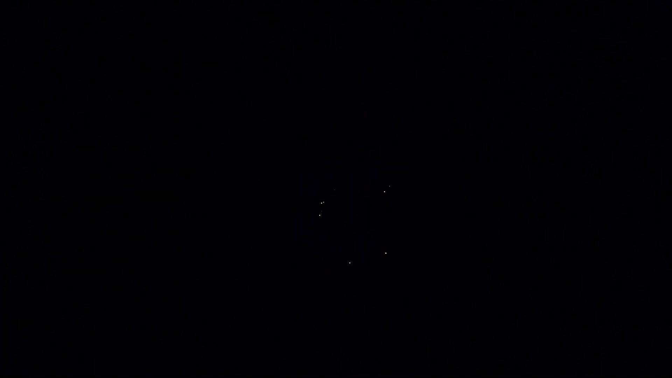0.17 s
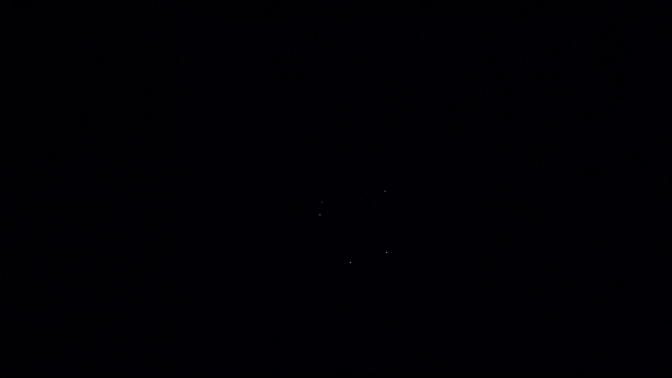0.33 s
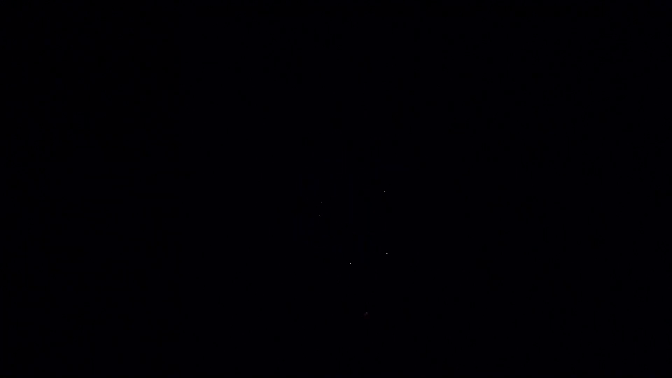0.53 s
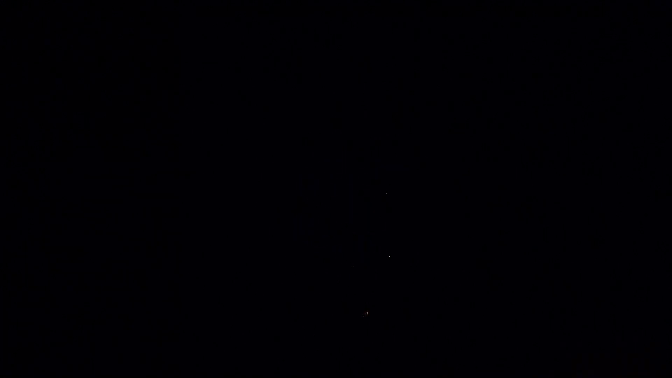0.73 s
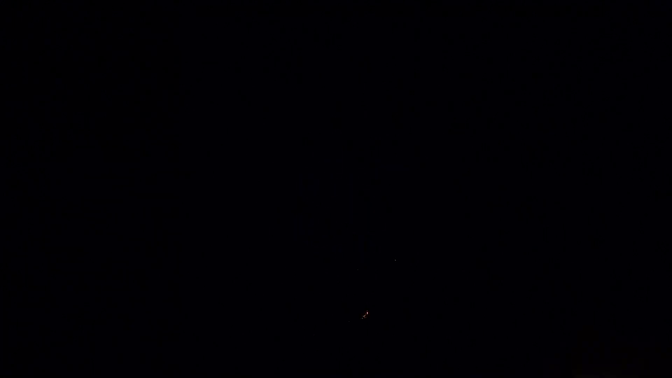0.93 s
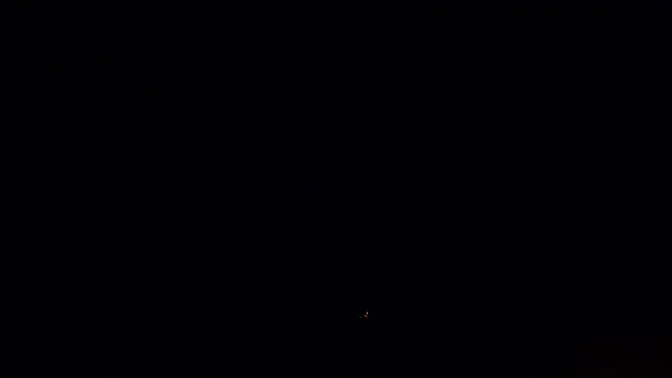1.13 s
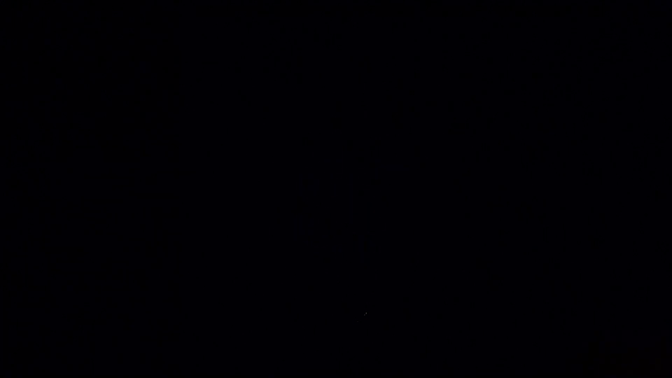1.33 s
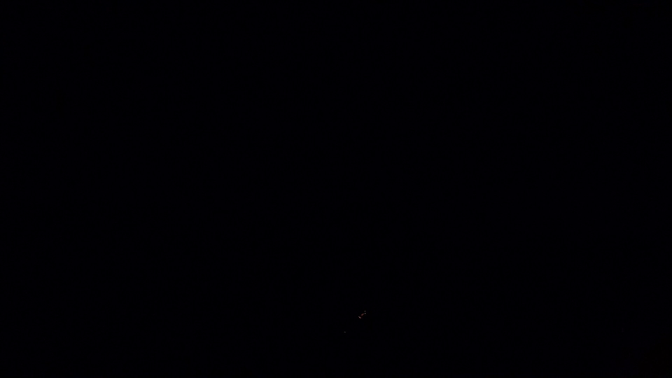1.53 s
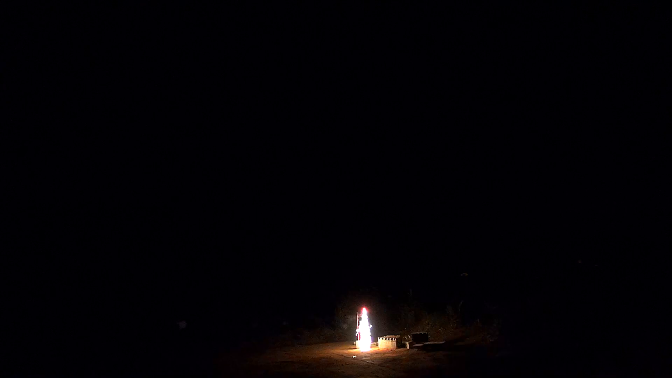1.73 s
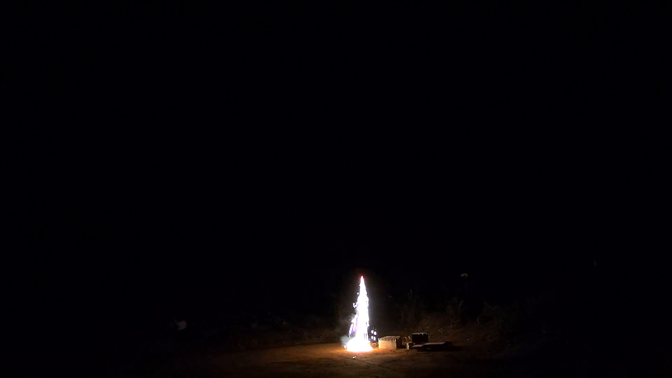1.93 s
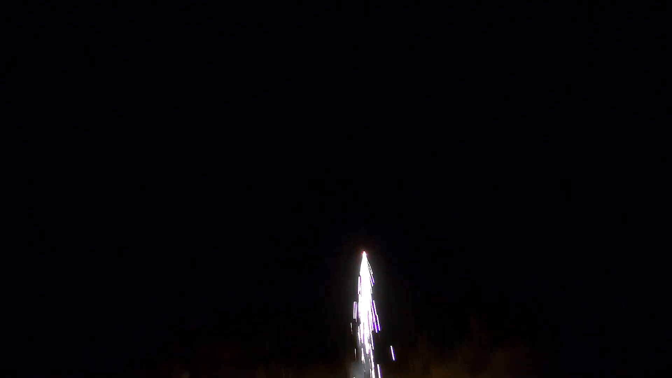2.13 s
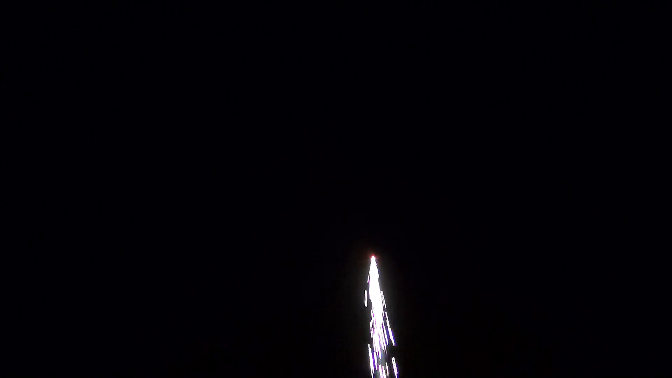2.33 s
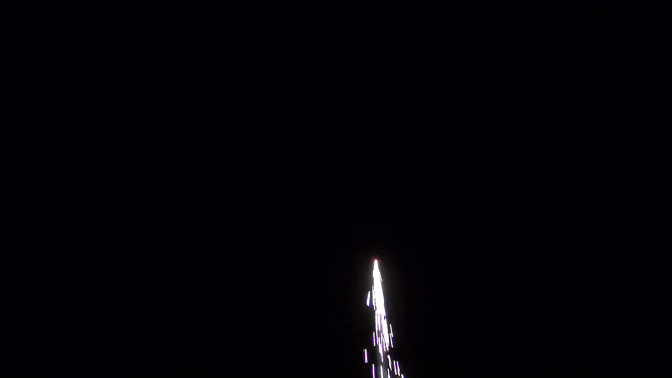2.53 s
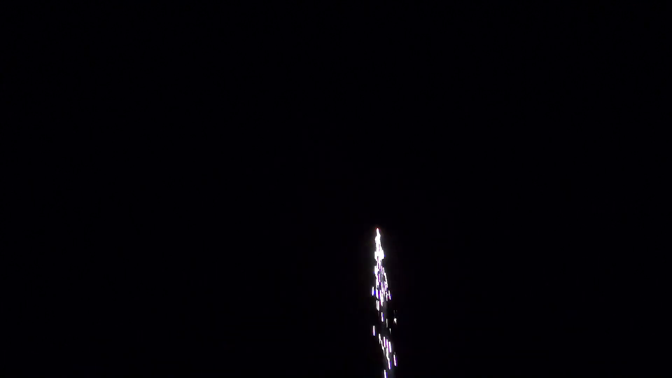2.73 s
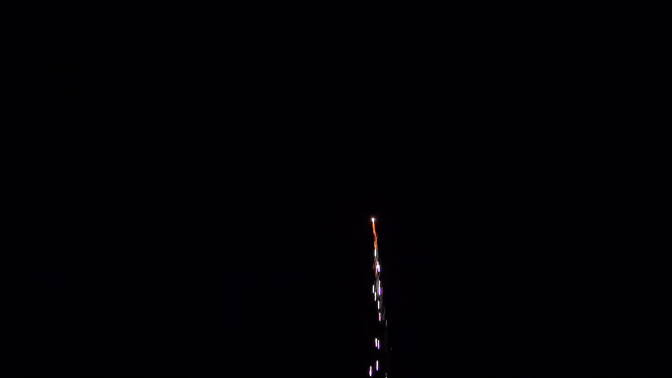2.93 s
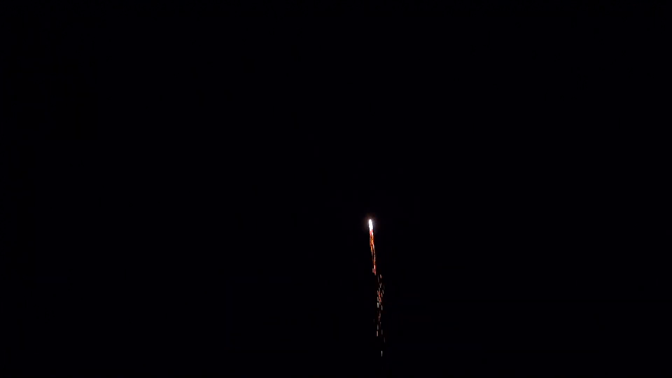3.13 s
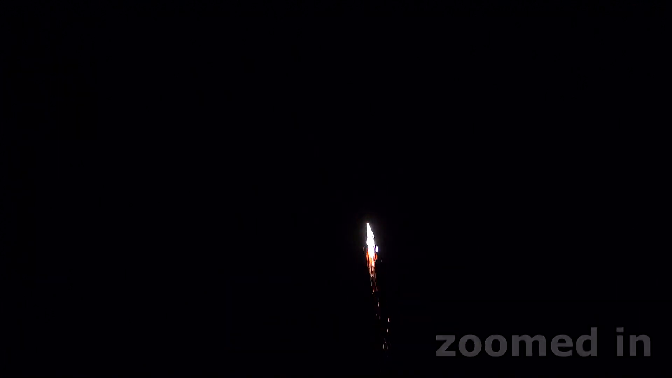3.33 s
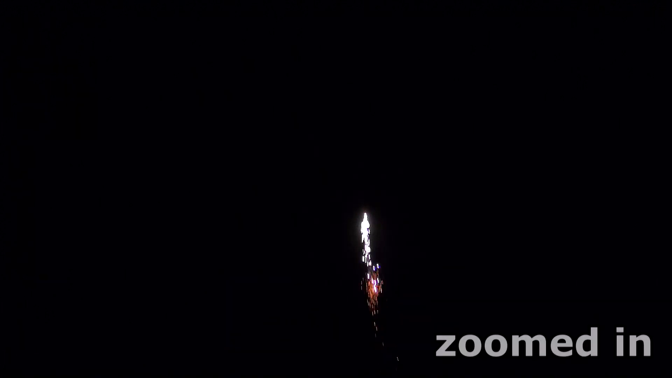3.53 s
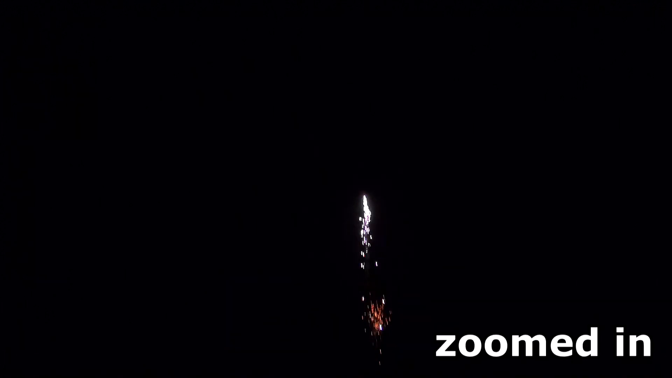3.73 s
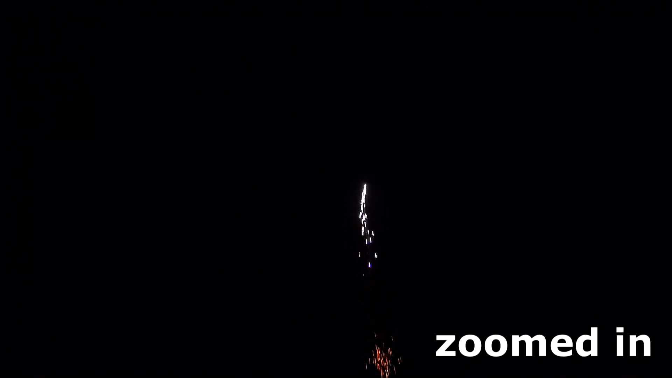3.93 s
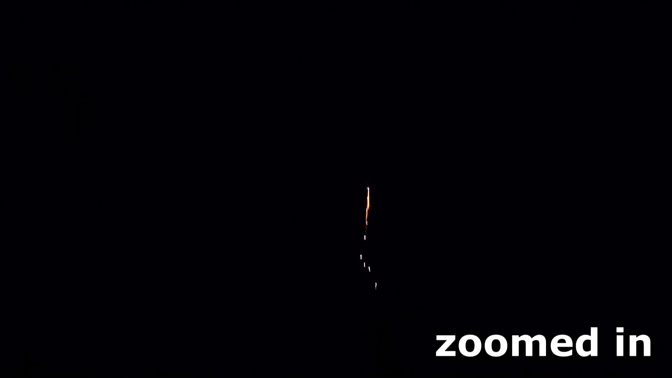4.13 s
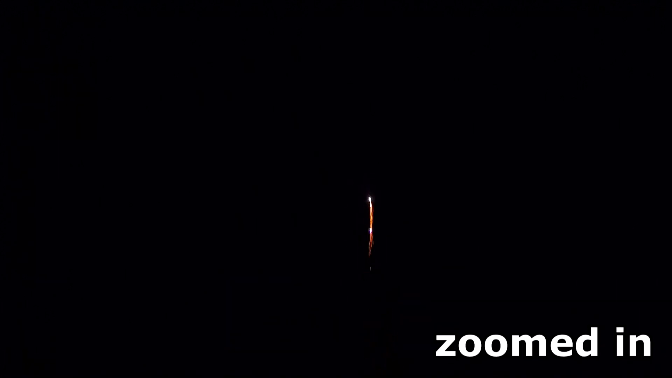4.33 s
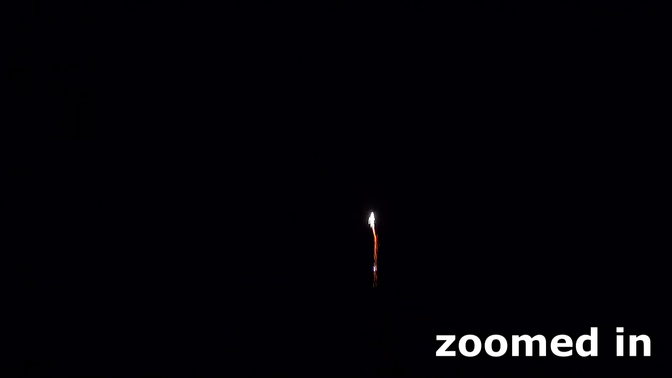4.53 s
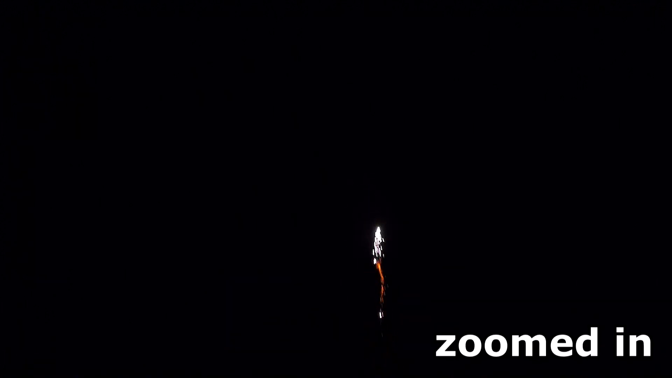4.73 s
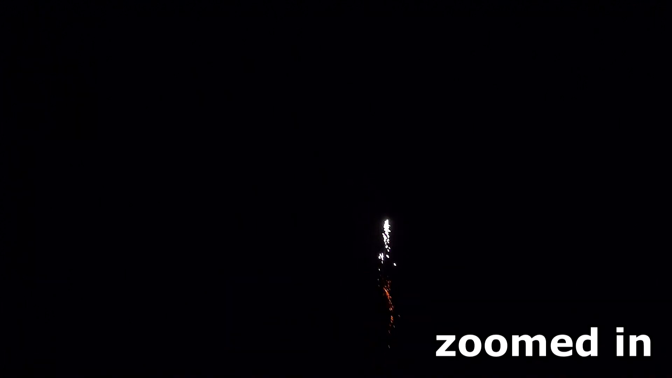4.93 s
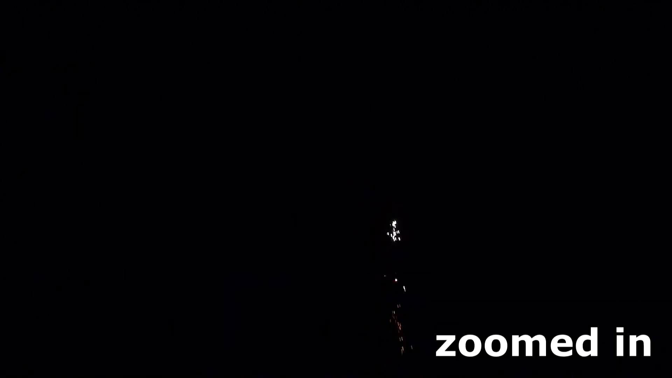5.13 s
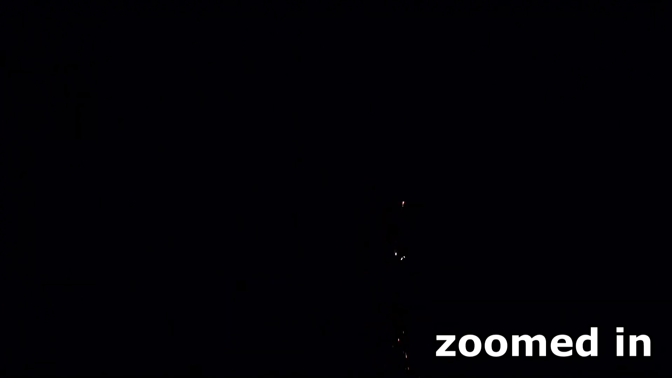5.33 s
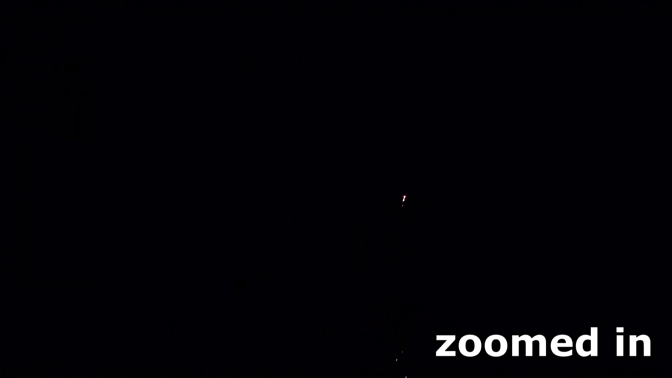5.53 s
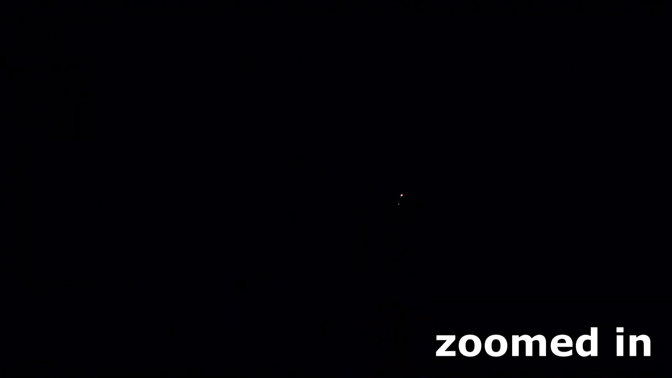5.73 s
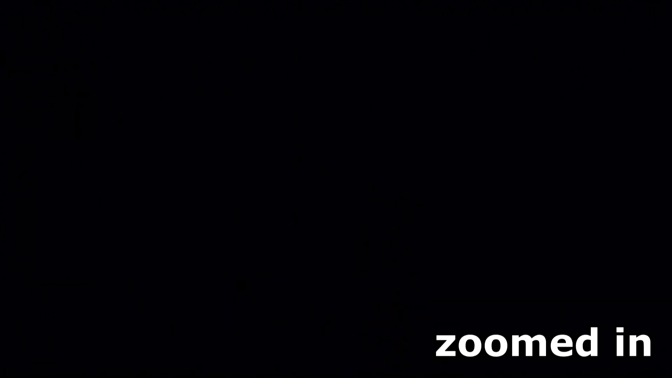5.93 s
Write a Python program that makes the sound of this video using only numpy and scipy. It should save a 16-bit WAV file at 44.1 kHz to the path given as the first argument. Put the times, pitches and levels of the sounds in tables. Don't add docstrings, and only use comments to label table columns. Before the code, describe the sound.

A fuse hisses and spits in a quiet open field at night, then a small rocket shrieks three falling whistles, each farther away and echoing.

```python
import sys
import numpy as np
from scipy import signal
from scipy.fft import rfft, irfft, next_fast_len
from scipy.io import wavfile
from scipy.ndimage import uniform_filter1d, minimum_filter1d, map_coordinates

SR = 44100
rng = np.random.default_rng(int(sys.argv[2]) if len(sys.argv) > 2 else 0)


def undo_db(level):
    steps = np.asarray(level, float) / 20
    return 10 ** steps


def materialize(psi):
    bounded = np.clip(np.atleast_2d(psi).T, -1, 1)
    quanta = np.round(bounded * 32767).astype(np.int16)
    wavfile.write(sys.argv[1], SR, quanta)


N = 267246


def unit(x):
    return x / np.sqrt(np.mean(np.abs(x) ** 2) + 1e-20)


def along(points, hz):
    f, v = np.transpose(points)
    return np.interp(np.log(hz + 1), np.log(f + 1), v)


def curves(rows):
    s, *columns = np.transpose(rows)
    t = np.arange(N) / SR
    gate = np.clip(np.minimum(t - s[0], s[-1] - t) / 0.0034, 0, 1)
    return [np.interp(t, s, column) for column in columns] + [gate]


def spells(rows):
    t = np.arange(N) / SR
    return [(np.cos(np.pi * np.clip((t - s) / length, -.5, .5)) ** 2, size) for s, length, size in rows]


def wobble(rate):
    return map_coordinates(rng.standard_normal(int(N * rate / SR) + 4), [np.arange(N) * rate / SR])


def blur(rate):
    return unit(wobble(rate) + 1j * wobble(rate))


def filtered(x, response):
    m = next_fast_len(N + 8192)
    return irfft(rfft(x, m) * response(np.fft.rfftfreq(m, 1 / SR)), m)[..., :N]


# (frequency [Hz], correlation [0-1])
LIKENESS = [(60, 0.94), (1000, 1), (4000, 1), (9000, 0.74)]


def rush(spectrum, band):
    def mid_and_side(hz):
        turn = np.arccos(np.clip(along(LIKENESS, hz), -1, 1)) / 2
        return undo_db(along(spectrum, hz)) * [np.cos(turn), np.sin(turn)]

    mid, side = filtered(rng.standard_normal((2, N)), mid_and_side)
    inside = filtered(mid, lambda hz: (hz > band[0]) * (hz < band[1]))
    return np.array([mid + side, mid - side]) / np.std(inside)


# (frequency [Hz], density [dB per Hz])
NIGHT_SPECTRUM = [(25, -32.5), (60, -4.5), (110, -2.5), (200, -6.5), (400, -20), (1000, -16), (3000, -24.5),
                  (8000, -52.5), (15500, -59)]
# (time [s], level [dB])
NIGHT_LEVEL = [(0, -66.5), (.55, -65), (1.25, -59.5), (3.0, -67.5), (4.08, -62.5), (4.45, -66.5),
               (6.05, -62)]


def night():
    air_db = curves(NIGHT_LEVEL)[0]
    return undo_db(air_db + 0.67 * wobble(6)) * rush(NIGHT_SPECTRUM, (50, 250))


# (time [s], level [dB])
FUSE_LEVEL = [(0, -70), (.34, -74.5), (.46, -60), (.66, -57.5), (.9, -58.5), (1.58, -55.5), (1.74, -56.5)]
# (frequency [Hz], density [dB per Hz])
FIZZ_SPECTRUM = [(1530, -28), (2600, -84), (2980, -20.5), (3680, 6.5), (4310, 7), (4870, -6), (5620, 1),
                 (6830, -14.5), (7770, -4), (8770, -64), (12200, -24), (13500, -2.5), (15800, -10)]
# (frequency [Hz], width [Hz], level [dB])
TUBE_MODES = [
    (1973, 150, 29),
    (2060, 87, -27.5),
]
# (frequency [Hz], density [dB per Hz])
RUSTLE_SPECTRUM = [(150, -34.5), (250, -3.5), (324, -5.5), (595, 0), (1010, 1), (1090, 2), (1560, -9),
                   (2500, -32), (3250, -65), (5500, -120)]


def burning_fuse():
    fizz_db, gate = curves(FUSE_LEVEL)
    now = np.arange(N) / SR
    enters_s, deeper_db_per_s, deepest_db = 0.56, 18, 8
    tube_db = fizz_db + np.clip(deeper_db_per_s * (now - enters_s), None, deepest_db)
    peak_s, peak_db, settle_db_per_s = 0.63, -56, 8.5
    rustle_db = peak_db - settle_db_per_s * np.abs(now - peak_s)

    def resonance(f):
        return sum(undo_db(db) * 1j * f * width / (hz * hz - f * f + 1j * f * width)
                   for hz, width, db in TUBE_MODES)

    tube = undo_db(tube_db + 1.4 * wobble(28)) * unit(filtered(rng.standard_normal(N), resonance))
    fizz = undo_db(fizz_db + 1.1 * wobble(150)) * rush(FIZZ_SPECTRUM, (3000, 15000))
    rustle = undo_db(rustle_db + 0.75 * wobble(1.8)) * rush(RUSTLE_SPECTRUM, (300, 1300))
    return gate * (tube + fizz + rustle)


# (time [s], peak level [dB], frequency [Hz], left minus right [dB])
SPARKS = [(0.146, -49, 3220, 6.5), (0.2673, -49, 4760, 6), (0.5166, -31, 2600, -5.5),
          (0.5986, -41, 3710, 0.5), (0.6036, -38.5, 2600, 6.5), (0.7824, -36.5, 4370, -11.5),
          (0.9704, -36, 2340, 1.5), (1.1448, -53, 4100, 2.5), (1.2894, -40, 4400, 6),
          (1.38, -31.5, 3830, -1.5), (1.4022, -40, 4250, 5.5), (1.4825, -52, 4300, -10.5),
          (1.608, -43.5, 4060, 0)]


def spits():
    out, t = np.zeros((2, N)), np.arange(SR // 50) / SR
    for s, db, hz, pan_db in SPARKS:
        fade = undo_db(db + 3 - 60 * t / .012) * (1 - np.exp(-t / .0004))
        crackle = uniform_filter1d(rng.standard_normal(len(t)), size=4)
        spit = fade * (.4 * np.sin(2 * np.pi * hz * t) + crackle)
        out[:, round(s * SR):][:, :len(t)] += spit * undo_db([[pan_db / 2], [-pan_db / 2]])
    return out


# (time [s], length [s], level [dB], left minus right [dB])
FLARES = [
    (.709, .03, -36, -1),
    (0.74, .036, -37, -1.5),
]
# (frequency [Hz], density [dB per Hz])
FLAME_SPECTRUM = [(59, -56), (100, -26), (189, -2), (413, -14), (832, 0), (1050, -42.5), (1470, -3),
                  (2670, -6), (4430, -5), (15800, -27)]


def fuse_flare():
    now = np.arange(N) / SR
    grains = unit(undo_db(3.7 * wobble(400) + 2.37 * wobble(120)))
    rise_s, sag_db, fall_s = .01, -3, .014
    flare = np.zeros((2, N))
    for s, length, db, pan_db in FLARES:
        corners = [-rise_s, 0, length, length + fall_s]
        shape_db = np.interp(now - s, corners, [-20, 0, sag_db, -25], -120, -120)
        flare += undo_db(db + shape_db + np.array([[pan_db], [-pan_db]]) / 2)
    return grains * flare * rush(FLAME_SPECTRUM, (400, 15000))


# (time [s], peak level [dB], frequency [Hz], decay time t60 [s])
KNOCKS = [
    (.765, -46, 620, .04),
    (4.256, -39.5, 96.8, 0.071),
    (4.64, -50, 190, .07),
    (5.74, -56, 45, .15),
    (5.232, -36.5, 109, 0.058),
]


def bumps():
    out, t = np.zeros(N), np.arange(SR // 8) / SR
    for s, db, hz, t60 in KNOCKS:
        fade = undo_db(db + 9.5 - 60 * t / t60) * (1 - np.exp(-t / 0.0056))
        out[round(s * SR):][:len(t)] += fade * np.sin(2 * np.pi * hz * t)
    return out


# (middle [s], length [s], level [dB])
FLAME_MISSES = [(1.739, .014, -9), (1.752, .014, 4), (1.805, 0.098, -10), (3.28, .03, 5), (2.135, .02, -6),
                (2.565, .03, -16.5), (3.253, 0.025, -8), (3.308, 0.02, -26), (3.375, 0.024, -23.5),
                (3.425, 0.0056, -16), (3.465, .025, -16.5), (3.5, 0.021, -18), (3.965, 0.05, -11.5),
                (3.996, 0.0065, -9), (4.665, 0.013, -12.5), (5.125, 0.008, -6.5), (5.246, 0.035, -10.5)]
# (middle [s], length [s], level [dB])
OVERTONE_SPELLS = [
    (2.79, 0.19, 20),
    (5.25, .05, -14),
    (4.86, 0.14, -5),
]
# (middle [s], length [s], extra blur [power ratio])
BREAKUPS = [
    (1.8, 0.24, 1.1),
    (1.99, 0.25, 0.54),
    (3.33, 0.24, 0.1),
    (4.62, 0.084, 0.077),
]
# (middle [s], length [s], level [dB])
QUARTER_SPELLS = [
    (2.06, .14, -27),
    (2.42, 0.83, -31),
    (3.365, 0.058, -45.5),
    (4.645, 0.041, -49.5),
]
# (multiple of the pitch [ratio], level [dB])
QUARTER_PARTIALS = [(.25, 0), (.75, 4.5), (1.25, 0.5), (1.75, 0.5)]


def pipe_tone(partials, full, tone_db, flow_db, half_db, rough, phase):
    tone_db = tone_db + sum(db * hump for hump, db in spells(FLAME_MISSES))
    clear_db = sum(db * hump for hump, db in spells(OVERTONE_SPELLS))
    second_db = full[0] + 1.96 * flow_db + clear_db
    twelfth_db = full[1] + 0.97 * flow_db + clear_db
    upper_db = full[1] + 2.5 * flow_db + clear_db
    rasp = np.abs(sum(more * hump for hump, more in spells(BREAKUPS)))
    quarter = sum(undo_db(db) * hump for hump, db in spells(QUARTER_SPELLS))
    levels = dict(partials)
    weaker_db = np.minimum(upper_db, second_db + levels[3] - levels[2] + 10.5)
    tone = np.zeros(N)
    for k, db in partials:
        share = rough * (.3 if k == 1 else 2.5)
        if k == 1:
            level_db = tone_db
        elif k == 2:
            level_db = second_db + 2.8 * wobble(20)
        elif k % 1 == 0:
            level_db = (twelfth_db if k == 3 else weaker_db) + db - levels[3] + 1.2 * wobble(50)
        else:
            level_db = half_db + db - levels[1.5] + 1.5 * wobble(45)
        flutter = 1 + np.sqrt(share) * blur(380) + .035 * k * blur(140)
        flutter = flutter + np.sqrt(rasp * k / 2) * blur(900)
        tone += np.sqrt(2) * undo_db(level_db) * np.imag(flutter * np.exp(1j * k * phase))
    for k, db in QUARTER_PARTIALS:
        tone += quarter * undo_db(db + 1.5 * wobble(31)) * np.imag(blur(150) * np.exp(1j * k * phase))
    return tone


# (middle [s], length [s], level [dB])
GAS_PUFFS = [
    (1.736, .022, -9),
    (1.749, 0.0042, 1.5),
    (3.9, .3, -3),
    (2.84, 0.34, -11),
    (3.36, 0.12, 5),
    (3.445, 0.013, 9.5),
    (4.04, 0.17, -7.5),
    (4.655, 0.046, 5),
    (5.238, 0.022, 15),
]
# (frequency [Hz], density [dB per Hz])
HISS_SPECTRUM = [(3000, -18.5), (6000, -0.5), (10000, -14), (13000, -6.5), (15500, -10.5)]
PIPE_RETURNS = (.3, .25)


def gas_jet(full, jet, hiss_band, air_hz, hz, flow_db, rough, phase):
    puff_db = sum(db * hump for hump, db in spells(GAS_PUFFS))
    body_db = full[2] + 0.93 * flow_db + puff_db - 3.5
    hiss_db = full[3] + 2.4 * flow_db + np.minimum(puff_db, 5) - 8.5
    puffs = 1 + 0.85 * np.cos(phase) + 0.26 * np.cos(phase / 2)
    sputter = undo_db(0.57 * wobble(30) + (1.3 + 4.5 * rough) * wobble(200))
    far_hiss = [(f, db - 6 * f / air_hz) for f, db in HISS_SPECTRUM]
    body = undo_db(body_db) * rush(jet, (300, 800))
    hiss = undo_db(hiss_db) * puffs * rush(far_hiss, hiss_band)
    gas = sputter * (body + hiss)
    n = np.arange(N)
    lap = 2 * SR / hz
    bunched = gas.copy()
    for turns, share in zip((1, 2), PIPE_RETURNS):
        bunched += share * np.array([np.interp(n - turns * lap, n, side) for side in gas])
    return 0.98 * bunched


def whistle(rows, full, partials, jet, hiss_band, air_hz):
    hz, tone_db, flow_db, half_db, gate = curves(rows)
    rough = np.clip(full[-1] * undo_db(2 * flow_db), 0, 1)
    unsteady_hz = hz * (1 + .0018 * wobble(60) + 0.011 * rough * wobble(300))
    phase = 2 * np.pi * np.cumsum(unsteady_hz) / SR
    tone = pipe_tone(partials, full, tone_db, flow_db, half_db, rough, phase)
    return gate * (tone + gas_jet(full, jet, hiss_band, air_hz, hz, flow_db, rough, phase))


# (time [s], pitch [Hz], tone level [dB], gas flow below full [dB], halving level [dB])
FIRST_CHARGE = [(1.72, 2206, -41.5, -36, -69.5), (1.742, 2539, -27.5, -11, -54.5),
                (1.747, 2645, -11.5, 4.5, -21.5), (1.86, 2714, -12, -1, -29), (2.2, 2351, -12, 0.5, -28),
                (2.6, 2096, -9.5, -0.5, -28.5), (2.72, 2232, -12, -4.5, -31.5),
                (2.805, 2417, -22.5, -22, -56), (2.835, 2625, -41, -31.5, -73)]
SECOND_CHARGE = [(3.215, 2640, -49, -30.5, -92.5), (3.233, 2193, -28, -16, -50),
                 (3.35, 1970, -16.5, -9.5, -37), (3.46, 1770, -17, -1.5, -33.5), (3.6, 1692, -2, 0, -43.5),
                 (3.92, 1619, -17, -2.5, -87.5), (3.932, 1717, -23.5, -7, -34.5),
                 (3.99, 1858, -22, -11, -39), (4.035, 2190, -37.5, -18.5, -87.5)]
THIRD_CHARGE = [(4.565, 2158, -51.5, -35, -95), (4.587, 1840, -29.5, -12, -49.5),
                (4.662, 1635, -22.5, -7, -34), (4.668, 1529, -14, -3, -65.5), (4.74, 1505, -24, -4.5, -50),
                (4.87, 1481, -15, -2.5, -60.5), (5.0, 1447, -14.5, 2, -66.5), (5.224, 1399, -17, 1, -52),
                (5.254, 1551, -35, -18.5, -58)]
# (octave [dB], upper overtones [dB], jet body [dB], jet hiss [dB], roughness [0-1])
FULL_FLOW = [
    (-29, -46, -35.5, -31.5, .36),
    (-20.5, -41.5, -47.5, -40.5, .01),
    (-26.5, -42.5, -50.5, -50.5, 0.02),
]
# (multiple of the pitch [ratio], level [dB])
CHARGE_PARTIALS = [
    [(0.5, -21), (1, 0), (1.5, -14.5), (2, -14), (2.5, -32.5), (3, -10), (3.5, -23.5), (4, -47.5),
     (4.5, -29.5), (5, -38.5), (5.5, -35), (6, -32.5), (6.5, -39.5), (7, -39)],
    [(0.5, -34), (1, 0), (1.5, -21), (2, -6.5), (2.5, -31.5), (3, -22), (3.5, -28), (4, -12.5),
     (4.5, -53.5), (5, -25.5), (5.5, -60), (6, -34.5), (6.5, -58.5), (7, -36.5), (7.5, -48), (8, -51.5),
     (8.5, -52.5), (9, -45.5)],
    [(0.5, -42.5), (1, 0), (1.5, -27.5), (2, 7.5), (2.5, -63.5), (3, -22), (3.5, -44), (4, -17.5),
     (4.5, -59), (5, -26.5), (5.5, -83), (6, -48.5), (6.5, -76.5), (7, -53.5), (7.5, -77.5), (8, -52.5),
     (8.5, -79), (9, -54), (9.5, -71), (10, -68.5)],
]
# (frequency [Hz], density [dB per Hz])
JET_SPECTRA = [
    [(25, -20), (100, -5), (350, -4), (700, 1), (1400, 1), (2200, 20), (3200, 5), (4500, 5.5), (8000, -5.5)],
    [(25, -49), (200, 1.5), (600, 6.5), (2200, 20), (4500, 12.5), (8000, -20.5), (12000, -32.5)],
    [(25, -50.5), (200, 5.5), (600, 11.5), (2200, 20.5), (4500, 10), (8000, -26), (12000, -37)],
]
# (low edge [Hz], high edge [Hz])
HISS_BANDS = [
    (9000, 15000),
    (6000, 6900),
]


def three_charges():
    shared = list(zip(FULL_FLOW, CHARGE_PARTIALS, JET_SPECTRA))
    rocket = whistle(FIRST_CHARGE, *shared[0], HISS_BANDS[0], air_hz=30900)
    rocket += whistle(SECOND_CHARGE, *shared[1], HISS_BANDS[0], air_hz=11000)
    rocket += whistle(THIRD_CHARGE, *shared[2], HISS_BANDS[1], air_hz=2600)
    return rocket


def ground(x):
    liftoff_s, start_m, thrust, climb = 1.72, .45, 16.5, 16.6
    distance_m, ear_m = 10, 1.7
    now = np.arange(N) / SR
    t = np.maximum(now - liftoff_s, 0)
    pushed = np.minimum(t, climb / thrust)
    height = start_m + thrust * pushed ** 2 / 2 + climb * (t - pushed)
    extra_m = np.hypot(distance_m, height + ear_m) - np.hypot(distance_m, height - ear_m)
    late = np.arange(N) - extra_m / 343 * SR
    left, right = map_coordinates(x[0], [late - .4]), map_coordinates(x[1], [late + .4])
    copy = undo_db(-6.0) * np.array([left, right])
    dull = filtered(copy, lambda hz: 1 / (1 + (hz / 5000) ** 2))
    grazing = np.clip((2.3 - now) / .4, 0, 1)
    return dull + grazing * (copy - dull)


# (time [s], left minus right [dB])
LEAN = [(1.7, 0.5), (2.8, 0), (3.3, 1), (3.8, -1.5), (5.2, -1.8)]


def direct_sound(rocket):
    lean_db = curves(LEAN)[0] / 2
    return undo_db(5 + np.array([lean_db, -lean_db])) * (rocket + ground(rocket))


# (frequency [Hz], level [dB])
ECHO_COLOUR = [(200, -21.5), (1500, 2.5), (3000, -2.5), (6000, -4), (9000, -6), (14000, -64.5)]


def echoes(x, profile):
    delay, db = np.transpose(profile)
    t = np.arange(int(delay[-1] * SR)) / SR
    shared, own = rng.standard_normal((2, len(t)))
    envelope = undo_db(np.interp(t, delay, db, left=-120) - 38.0)
    tail = envelope * np.array([shared + .35 * own, shared - .35 * own])
    reflected = signal.fftconvolve(x[None], tail, axes=1)[:, :N]
    return filtered(reflected, lambda hz: undo_db(along(ECHO_COLOUR, hz)))


def sideways(x, speed):
    n = np.arange(N)
    return map_coordinates(x, [n + speed * (n - 4 * SR) + 160 * speed * wobble(70)])


# (delay [s], level [dB])
WALL_ECHOES = [(0.014, -26), (.05, -34.5), (.1, -49), (0.114, -14.5), (0.152, -16), (0.171, -23),
               (.24, -42.5), (.27, -27), (0.338, -44), (0.399, -43.5)]
# (delay [s], level [dB])
TREE_ECHOES = [(.25, -37.5), (.4, -35), (.7, -47.5), (1.1, -50.5), (1.5, -48), (2.2, -57)]


def field(rocket):
    mono = undo_db(5.0 * (np.arange(N) / SR - 3.5)) * rocket.mean(axis=0)
    walls = echoes(sideways(mono, speed=0.013), WALL_ECHOES)
    toward_trees = sideways(mono, speed=0.055) + undo_db(-8) * sideways(mono, speed=0.1)
    return walls + echoes(toward_trees, TREE_ECHOES)


def scene():
    rocket = three_charges()
    fuse = burning_fuse() + spits() + fuse_flare()
    return night() + fuse + bumps() + direct_sound(rocket) + field(rocket)


def band_limit(x):
    return signal.sosfilt(signal.butter(12, 17000, fs=SR, output="sos"), x)


def record(dry):
    knee_db, squeeze, follow_s = -14.5, .6, .006
    step = 1 / (follow_s * SR)
    power = signal.lfilter([step], [1, step - 1], np.mean(dry ** 2, axis=0))
    loud_db = 10 * np.log10(power + 1e-12)
    dry = dry * undo_db(-squeeze * np.maximum(loud_db - knee_db, 0))
    needed = np.minimum(1, 0.68 / (np.abs(dry).max(axis=0) + 1e-9))
    gain = uniform_filter1d(minimum_filter1d(needed, size=160), size=160)
    mix = filtered(gain * dry, lambda hz: hz < 15930)
    return band_limit(mix)


dry = scene()
out = record(dry)
materialize(out)
```